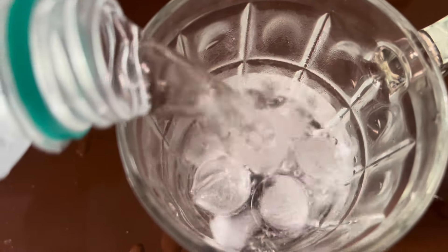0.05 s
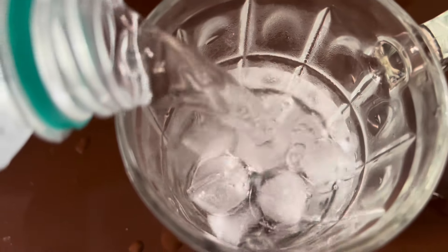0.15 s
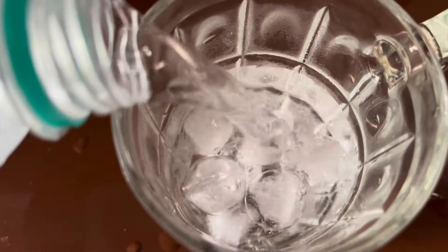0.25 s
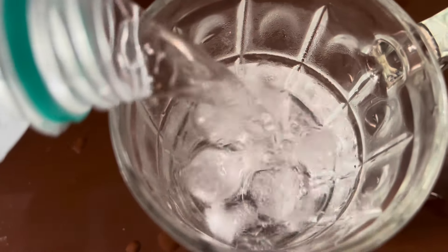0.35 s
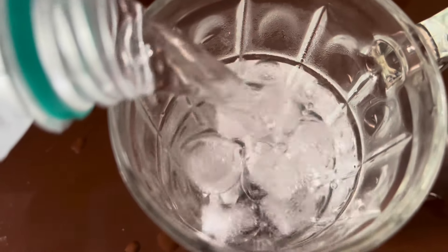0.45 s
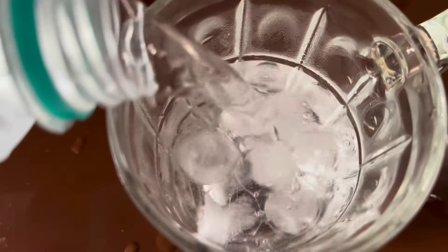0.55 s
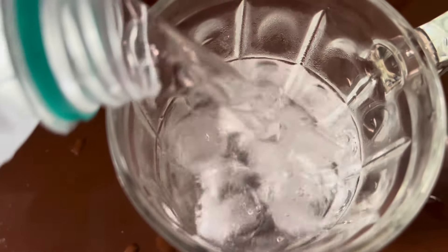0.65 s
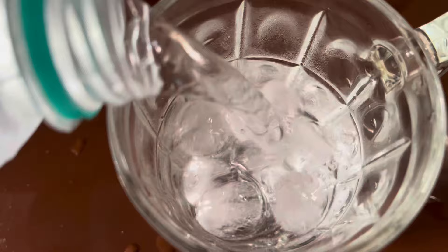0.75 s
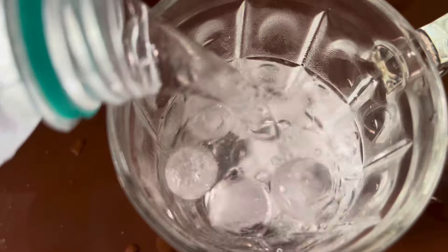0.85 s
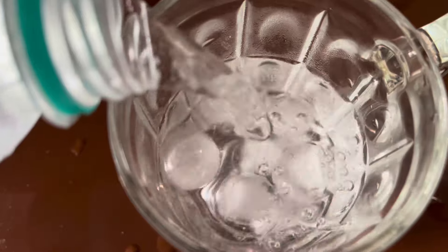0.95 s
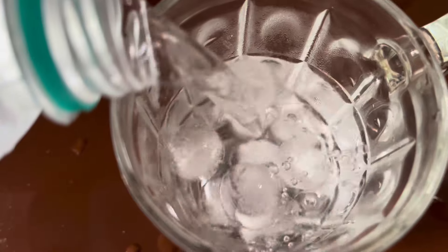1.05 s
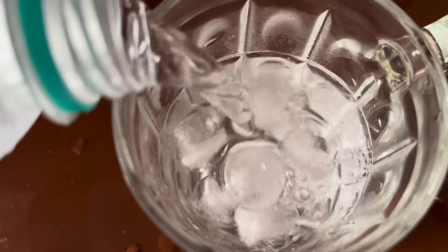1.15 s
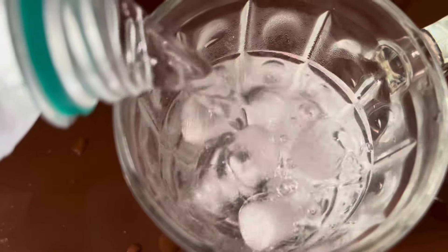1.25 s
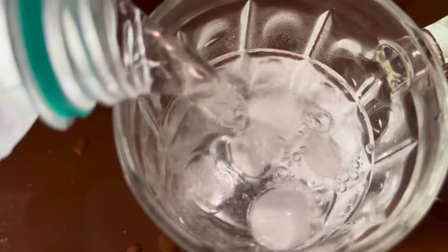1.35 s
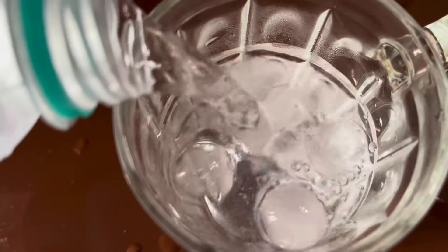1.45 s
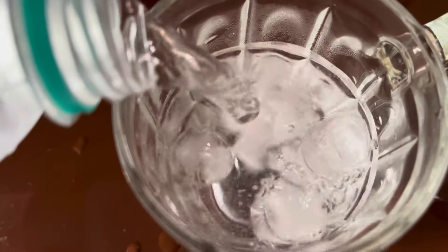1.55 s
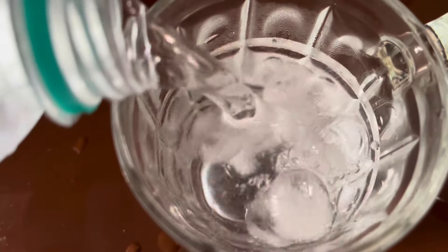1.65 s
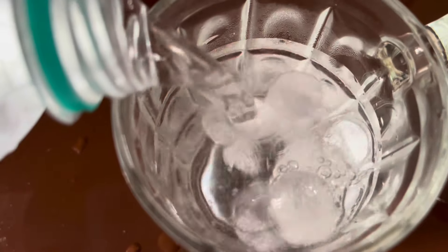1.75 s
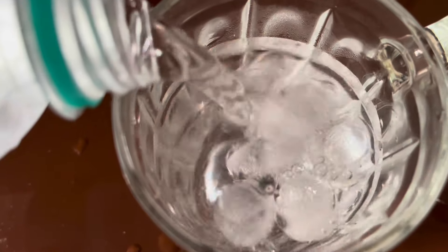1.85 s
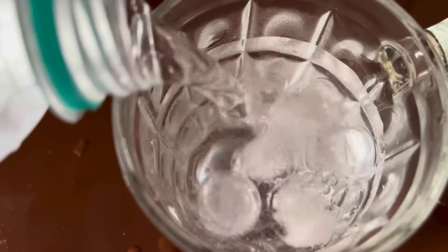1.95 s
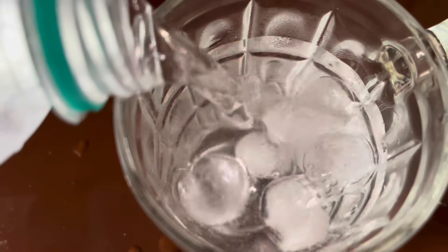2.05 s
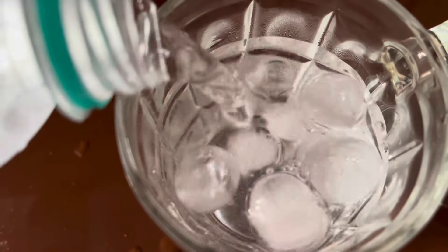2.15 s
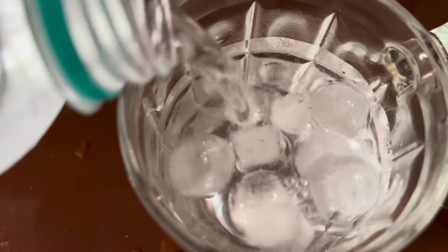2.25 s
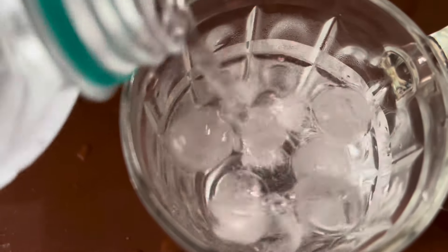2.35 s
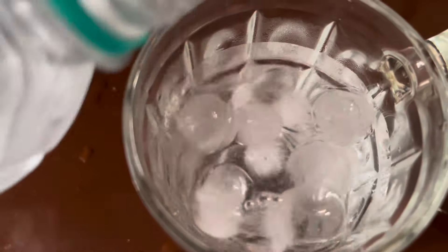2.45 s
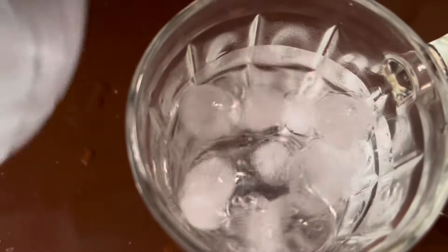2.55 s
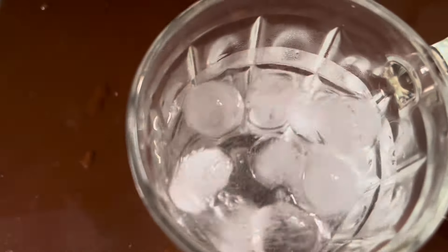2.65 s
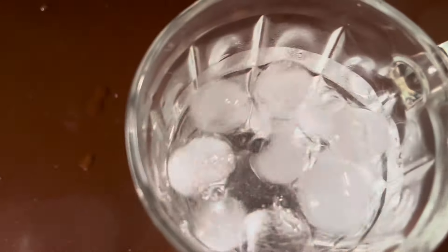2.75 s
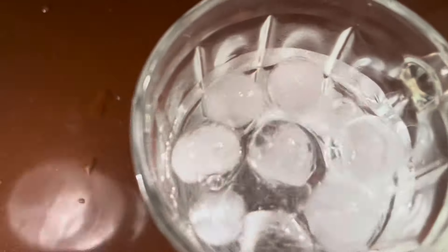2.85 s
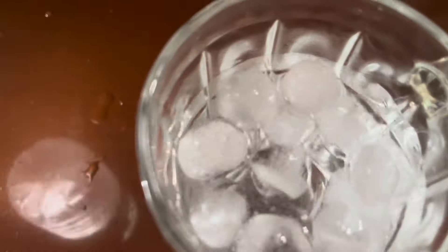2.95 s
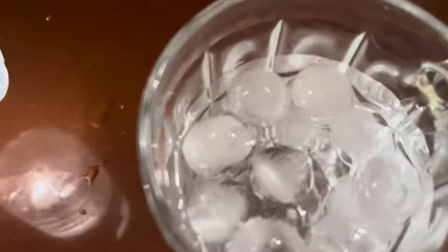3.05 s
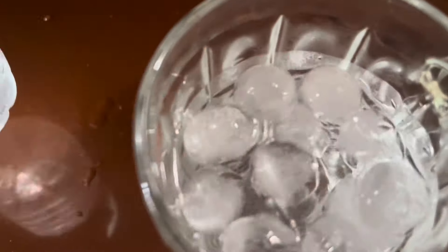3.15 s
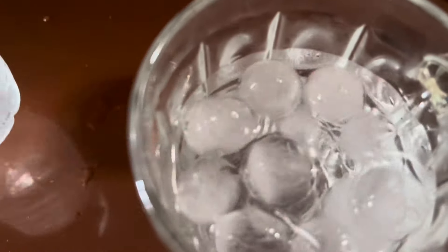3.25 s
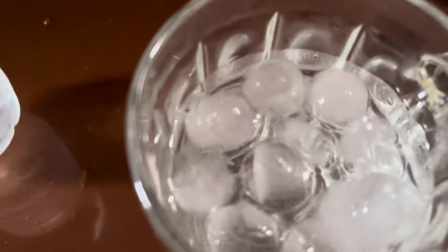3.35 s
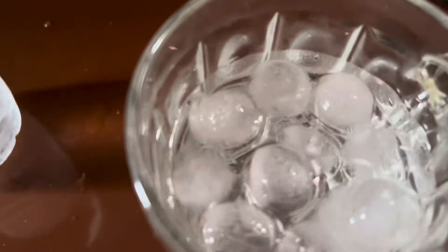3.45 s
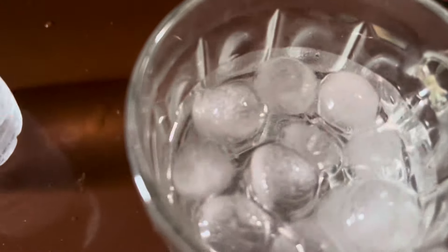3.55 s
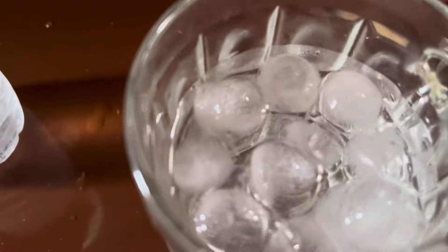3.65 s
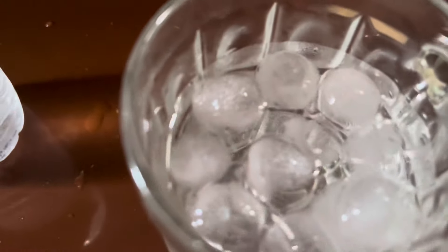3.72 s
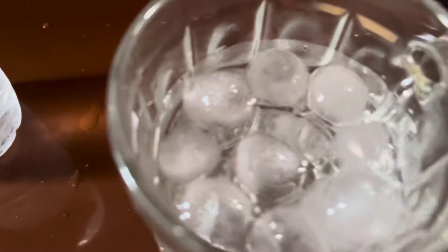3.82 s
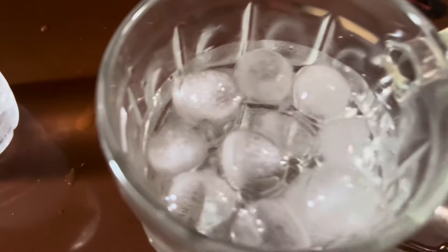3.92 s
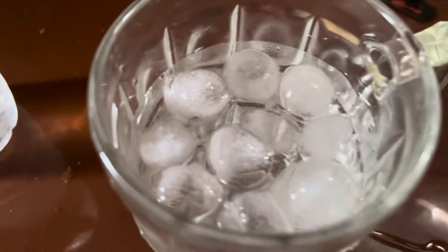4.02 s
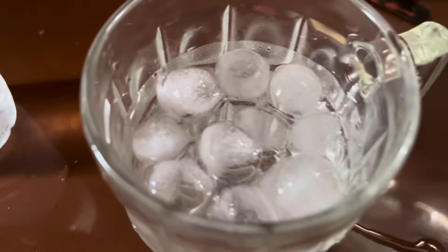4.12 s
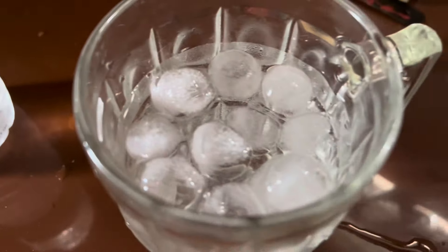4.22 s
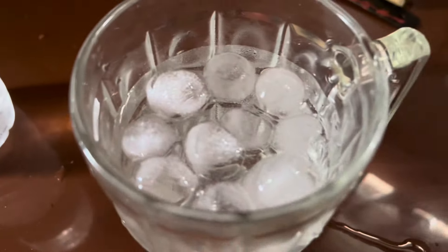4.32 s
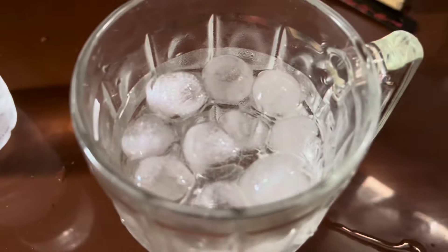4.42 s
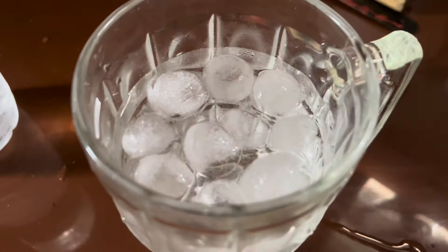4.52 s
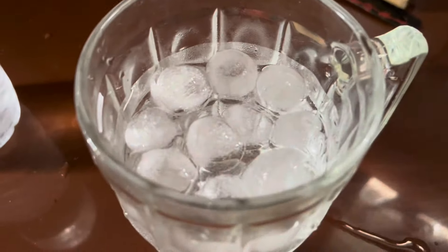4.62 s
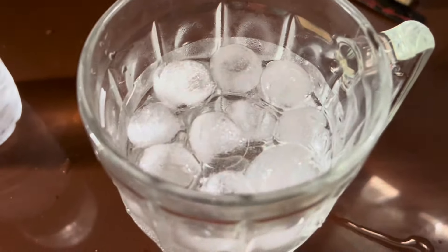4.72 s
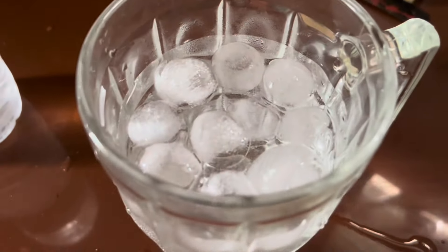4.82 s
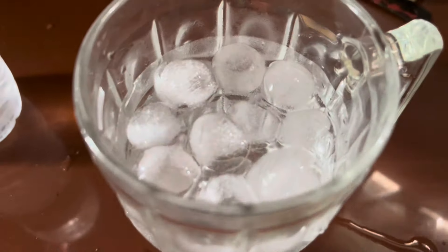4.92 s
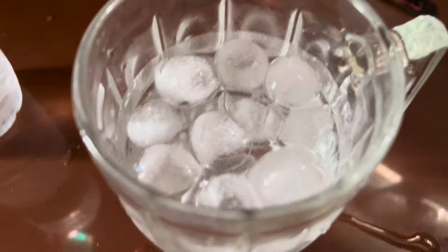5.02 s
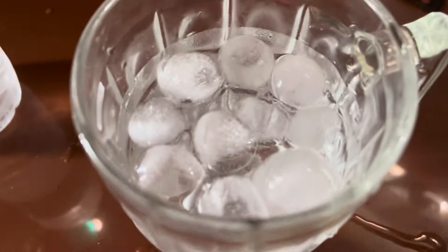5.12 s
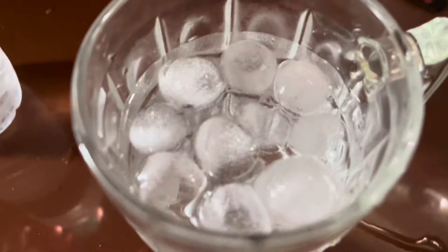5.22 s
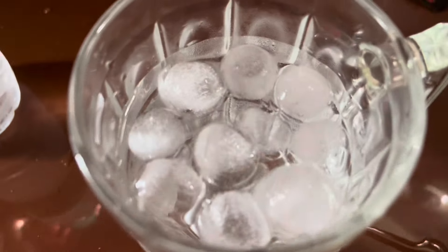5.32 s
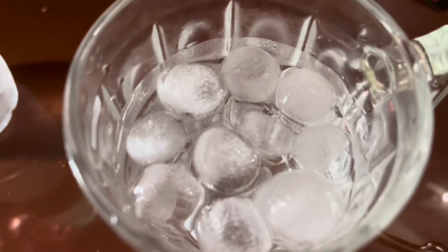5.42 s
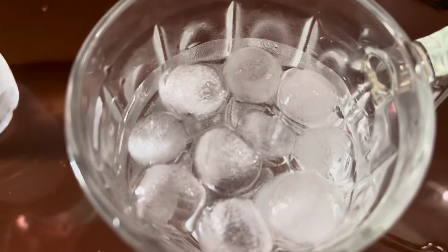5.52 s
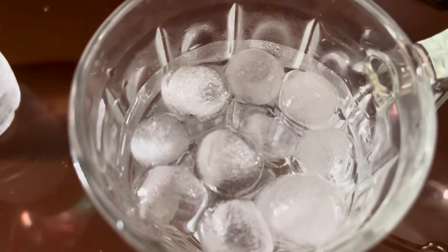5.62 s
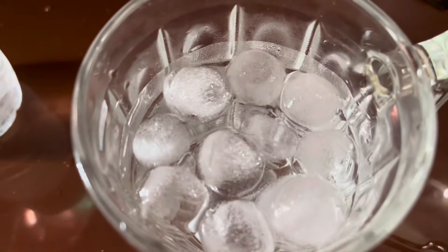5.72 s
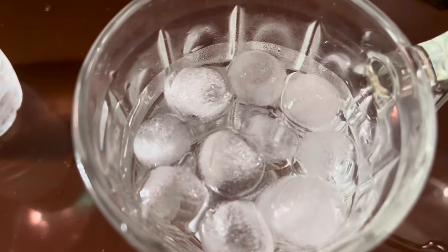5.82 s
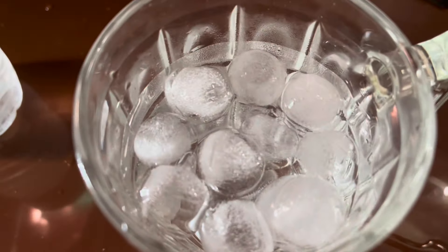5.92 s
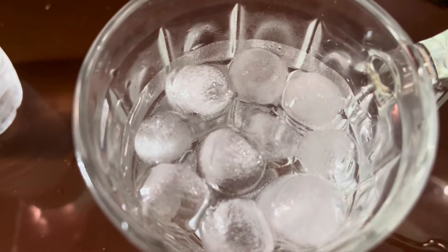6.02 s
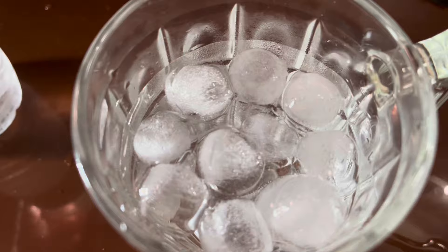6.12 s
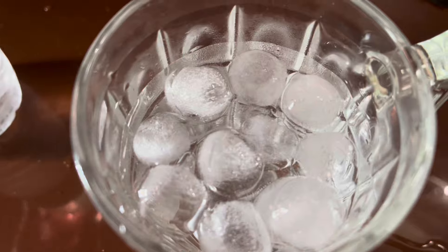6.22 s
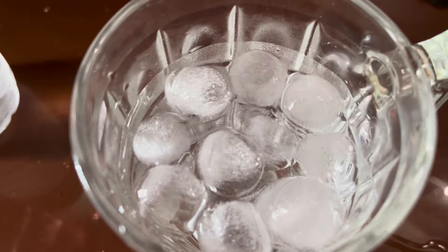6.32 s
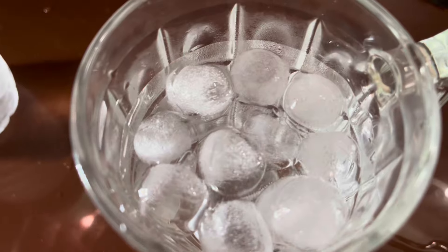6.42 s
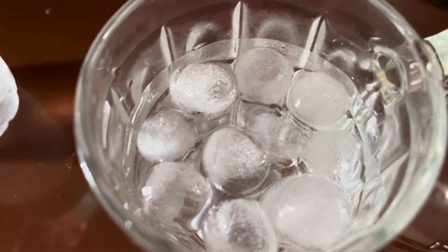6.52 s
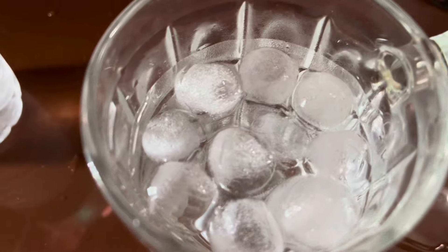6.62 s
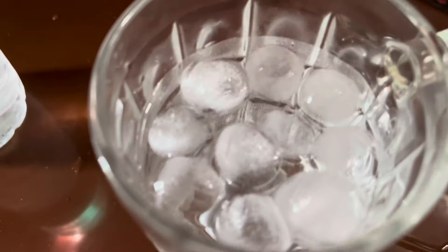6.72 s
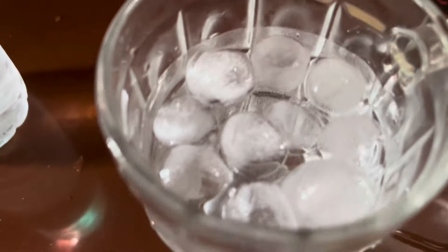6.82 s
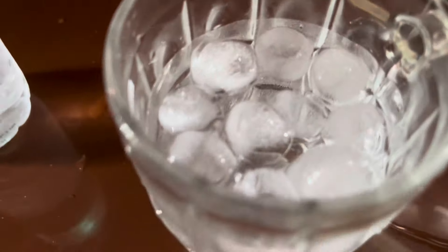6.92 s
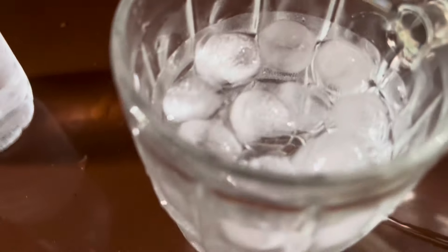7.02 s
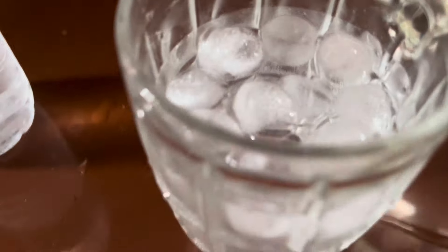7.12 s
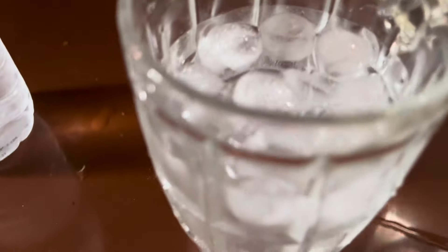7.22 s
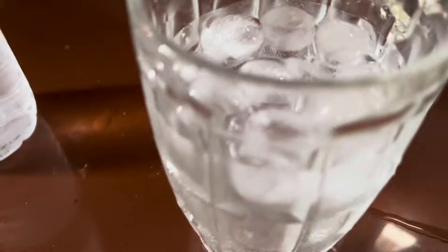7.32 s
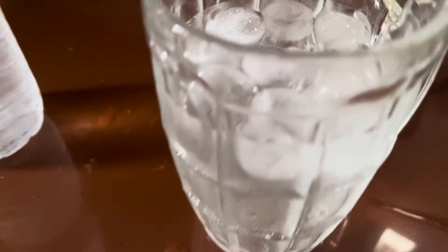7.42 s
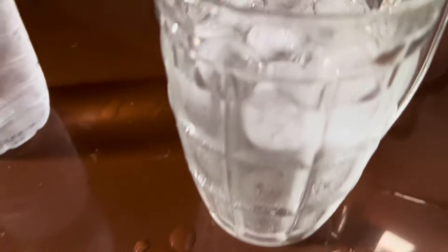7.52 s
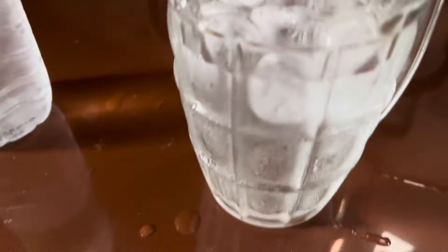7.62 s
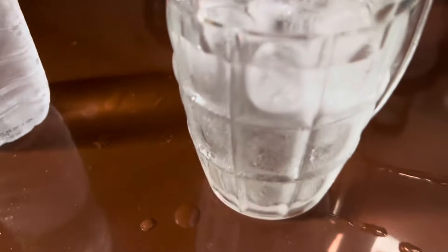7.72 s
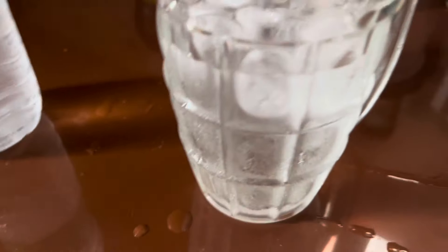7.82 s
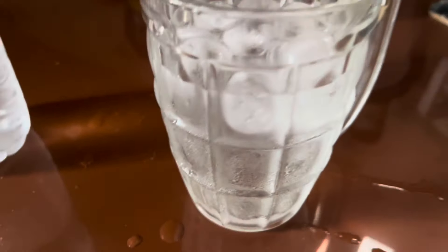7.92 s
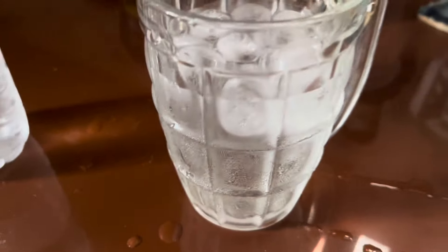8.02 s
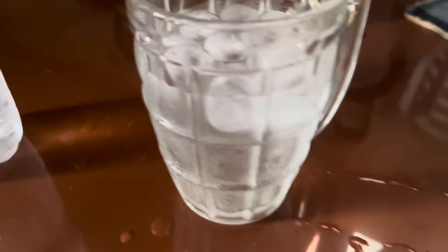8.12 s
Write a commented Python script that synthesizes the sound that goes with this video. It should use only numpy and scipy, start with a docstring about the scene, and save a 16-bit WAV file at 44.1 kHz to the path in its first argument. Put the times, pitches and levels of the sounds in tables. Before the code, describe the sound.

From the start, water glugs close by from a plastic bottle onto ice balls in a glass mug. Strong hollow plops come thickest in the first half second, with splashes and crowds of small bubbles whose pitch climbs as the mug fills. Ice cracks sharply and ticks against the glass, leaving short bright rings that sink slightly. The flow weakens after 1.3 s, surges briefly and ends around 2.5 s, with a last trickle and scattered clinks until 3.4 s. A plastic snap at 2.8 s, a small scrape at 3.2 s and a woody thud at 3.5 s mark the bottle being set down. Then it is quiet: small plastic clicks at 5.2 and 5.6 s, muffled finger thumps, faint cloth and skin brushing. At 7.7-8 s something drags in stuttering wooden slips, farther off left. Low room hum, rumble and faint hiss sit beneath; the sound is close, dry, stereo phone pickup.

```python
"""Water pours from a bottle onto ice balls in a glass mug, close to a phone: air pockets plop as damped sines
over noise splashes and a crowd of small bubbles, pitched up as the air column shortens. Ice cracks in patchy
noise on the wall, whose ringing modes sink as it fills. Then the bottle is set down on a wooden table, plastic
clicks, something drags farther off to the left, a hand shifts on the case and cloth and skin brush near it.
The quiet room behind is filtered noise, with a hum near 98 Hz."""
import sys
import numpy as np
from scipy import signal
from scipy.fft import rfft, irfft, next_fast_len
from scipy.io import wavfile
from scipy.ndimage import uniform_filter1d, map_coordinates

SR = 44100
rng = np.random.default_rng(int(sys.argv[2]) if len(sys.argv) > 2 else 0)


def inscribe(sig):
    """Save sig as 16-bit PCM at rate SR to the path in sys.argv[1].

    A 1-D sig is mono; a 2-D sig holds one channel per row.
    Samples are clipped to [-1, 1] before scaling.
    """
    pcm = np.round(np.clip(np.atleast_2d(sig).T, -1, 1) * 32767)
    wavfile.write(sys.argv[1], SR, pcm.astype(np.int16))


N = 360297

# Levels in dB are relative within each layer unless a comment says more.
# Large air pockets in the mug. Each row: start in seconds, level in dB, pitch in Hz, ringing time in seconds.
PLOPS = [(0.0298, -18, 1110, 0.073), (0.0403, -16.5, 1118, 0.057), (0.051, -37, 1130, 0.074),
         (0.066, -22, 1100, 0.044), (0.0858, -7.5, 1130, 0.028), (0.098, -29, 1420, 0.029),
         (0.108, -11.5, 1280, 0.021), (0.13, -20.5, 1220, .024), (0.171, -26.5, 1310, 0.013),
         (0.182, -21, 2250, 0.011), (0.225, -29, 2070, 0.016), (0.234, -25, 2700, 0.017),
         (0.245, -26, 1050, 0.0058), (0.285, -26, 1100, 0.012), (0.322, -24.5, 1350, 0.03),
         (0.355, -39, 1510, .017), (0.369, -14, 1260, 0.01), (0.385, -33, 1600, 0.017),
         (0.393, -24, 1580, 0.016), (0.402, -32, 1130, .025), (0.423, -27, 1690, 0.018),
         (0.432, -14.5, 1130, 0.0093), (0.445, -25.5, 1006, 0.1), (0.454, -26, 1210, 0.015),
         (0.476, -27, 1930, 0.021), (0.485, -25, 979, 0.089), (0.547, -29, 1890, 0.05),
         (0.58, -17.5, 2844, 0.03), (0.597, -28.5, 1270, 0.028), (0.631, -32, 1340, 0.029),
         (0.662, -17, 1265, 0.0066), (0.745, -20.5, 1500, 0.019), (0.759, -23.5, 1790, .03),
         (0.768, -22.5, 1080, 0.052), (0.784, -30, 1480, 0.022), (0.799, -27, 1400, 0.016),
         (0.808, -21.5, 2810, 0.033), (0.834, -25.5, 2170, .016), (0.846, -25, 1300, 0.033),
         (0.863, -18.5, 1510, 0.012), (0.882, -32, 1500, 0.022), (0.942, -29, 1760, 0.038),
         (0.981, -34, 1190, .02), (0.999, -25, 2430, 0.014), (1.011, -35, 1430, 0.016),
         (1.035, -18.5, 1390, 0.0063), (1.071, -27.5, 1330, 0.025), (1.083, -26, 1400, 0.024),
         (1.099, -25.5, 1420, 0.0088), (1.145, -33, 1500, 0.041), (1.186, -21, 2610, 0.04),
         (1.218, -24.5, 1654, 0.039), (1.254, -28, 1550, .024), (1.262, -30, 2160, 0.017),
         (1.272, -20.5, 1797, 0.038), (1.304, -34, 1840, 0.022), (1.374, -36, 2870, 0.026),
         (1.419, -29.5, 2100, 0.0086), (1.538, -32, 2280, 0.034), (1.605, -36, 1640, .024),
         (1.648, -23.5, 1650, .022), (1.662, -25.5, 1580, 0.03), (1.682, -25, 1600, 0.021),
         (1.716, -30, 1470, .024), (1.768, -36, 1800, 0.018), (1.786, -32.5, 1780, 0.019),
         (1.872, -32, 1690, 0.028), (2.001, -39.5, 1640, .022), (2.081, -29, 1714, 0.051),
         (2.27, -25.5, 2050, 0.0083), (2.335, -37, 2110, .02), (2.583, -40, 2030, .025)]
# Bubbles bursting at the surface. Each row: start in seconds, level in dB, starting Hz, t60 in seconds.
BLIPS = [(0.071, -25, 2380, 0.035), (0.8, -23.5, 2240, 0.041), (2.083, -29.5, 1597, 0.054),
         (2.112, -38, 1840, 0.04)]
# Splash colour in the empty and in the full mug. Each row: frequency in Hz, density in dB per Hz.
SPLASH_EMPTY = [(600, -42), (950, -1), (1500, 12.5), (2200, -19), (3100, 16), (3600, -43), (6000, -11),
                (12000, -39)]
SPLASH_FULL = [(900, -38), (1500, -1), (2200, 7), (3100, -11), (3600, -29), (6000, -14), (12000, -57)]
# Flow of the stream. Each row: time in seconds, level in dB.
FLOW = [(0.0, -46), (0.5, -46.5), (0.85, -45.5), (1.3, -56), (1.7, -49), (1.9, -57.5), (2.1, -48),
        (2.3, -51.5), (2.42, -59), (2.7, -56.5)]
# Ice on the wall. Each row: start in seconds, crack, low pair, middle ring and high ring levels in dB.
CLINKS = [(0.0386, -34.5, -59, -60, -65), (0.085, -12.5, -38, -46, -39), (0.1094, -28.5, -55, -55, -49),
          (0.1441, -33.5, -60, -59, -52), (0.1796, -39, -49, -60, -52), (0.2208, -38.5, -42.5, -59, -60),
          (0.369, -52, -49, -48, -50), (0.382, -41, -48, -46, -47), (0.399, -33.5, -55, -55, -46),
          (0.4302, -37.5, -35.5, -47, -43), (0.4431, -36, -46, -55, -40), (0.4787, -29, -40, -58, -44),
          (0.4847, -31, -37.5, -52, -57), (0.547, -39, -47, -46, -63), (0.5797, -44, -50, -55, -52),
          (0.659, -27, -46, -43.5, -43.5), (0.742, -35, -43, -45, -54), (0.7694, -32.5, -38, -42, -40),
          (0.833, -33, -40, -35.5, -57), (0.9068, -36.5, -64, -50, -55), (0.9962, -30.5, -50, -44, -48),
          (1.0103, -39, -47, -42, -48), (1.153, -43, -46, -63, -67), (1.1866, -27.5, -39, -48, -61),
          (1.217, -31, -55, -41, -42), (1.2336, -43, -39, -57, -63), (1.2527, -49, -53, -54, -58),
          (1.2706, -19.5, -45, -53, -45), (1.377, -34, -49, -41.5, -51), (1.402, -36, -51, -53, -53),
          (1.4195, -34, -52, -37.5, -43), (1.441, -35, -39, -66, -53), (1.5, -42, -49, -43.5, -46.5),
          (1.5682, -39.5, -51, -67, -67), (1.588, -36, -55, -62, -57), (1.6196, -26, -42.5, -61, -64),
          (1.662, -41, -50, -55, -61), (1.6798, -35, -60, -50, -39.5), (1.7304, -35, -43, -48, -55),
          (1.7493, -34, -53, -65, -54), (1.7728, -37, -48, -39, -61), (1.8297, -26.5, -38.5, -71, -56),
          (1.8662, -26, -38, -47, -34.5), (1.934, -41, -58, -64, -62), (2.0003, -55, -44, -50.5, -66),
          (2.0542, -47, -46, -50, -60), (2.078, -26.5, -44, -46, -46), (2.0975, -40, -46, -48, -60),
          (2.1341, -36, -44.5, -42.5, -45), (2.174, -47, -45.5, -63, -47), (2.234, -34, -50, -46, -52),
          (2.2472, -33, -42, -58, -43), (2.2717, -34, -45, -57, -52), (2.292, -34, -41, -44, -47),
          (2.338, -35, -42, -51, -52), (2.39, -53, -58, -64, -64), (2.4197, -27.5, -46, -46, -35),
          (2.5453, -39, -40.5, -47, -40), (2.5849, -35.5, -44.5, -55, -50), (2.644, -38, -52, -69, -49),
          (2.6883, -45, -51.5, -62, -52), (2.742, -39.5, -50.5, -48.5, -61), (2.767, -34, -49, -51, -52),
          (2.8931, -31, -52, -55.5, -46), (2.9163, -41, -63, -51.5, -56), (2.9605, -42.5, -53, -49, -62),
          (3.0159, -37.5, -57, -61, -58), (3.0413, -36, -57, -67, -46), (3.2945, -33.5, -53.5, -60, -46),
          (3.3526, -39, -65, -63, -51), (3.4196, -42, -57, -56, -69), (3.447, -48, -58, -71, -68)]
# Wall modes of the mug. Each row: Hz when pouring starts, Hz when full, level in dB, t60 in seconds.
LOW_RING = [(1930, 1755, -4, 0.19), (1721, 1590, -5.5, 0.24)]
MIDDLE_RING = [(3150, 3105, 0.005, 0.23)]
HIGH_RING = [(4570, 4200, 2, 0.049), (6400, 5300, -4.5, 0.014)]
# The ice drifts round the wall and favours one of the low pair.
# Each row: time in seconds, extra level of the second over the first in dB.
PAIR_LEAN = [(0, -15), (1.1, -7.5), (1.4, 1), (1.48, -8), (1.62, 2), (1.78, -6), (1.83, 1), (1.87, -9),
             (2.03, 9), (2.2, -3), (2.35, 5), (2.56, -5), (2.8, -3), (2.96, 4), (3.45, 11)]
# Crack of ice, also the colour of the spray. Each row: frequency in Hz, density in dB per Hz.
TICK = [(600, -32), (1050, -35), (1600, -7), (2400, -7), (3200, 1), (3700, -9.5), (4400, -4.5),
        (5000, -3.5), (6200, -10), (8000, -12.5), (10500, -11.5), (11800, -24), (15500, -77)]
# Plastic near the phone. Each row: start in seconds, level in dB, first Hz, second Hz,
# second level in dB, crack level in dB, t60 in seconds.
CLICKS = [(2.823, -20, 1930, 1100, -4.5, -8, 0.016), (3.17, -47, 1770, 330, 2, -2, 0.02),
          (3.192, -38.5, 1150, 1820, -7, -11, 0.047), (3.534, -48, 1210, 670, 15.5, -13, .022),
          (4.388, -45, 2260, 1250, -5, -2, 0.026), (5.2183, -24, 2970, 3640, -7.5, -11, 0.019),
          (5.26, -28, 1360, 3090, -1, -9.5, 0.0093), (5.593, -46.5, 2310, 3750, -3, 7.5, 0.056),
          (5.61, -31, 3650, 1530, -11, 1, 0.019), (5.62, -32.5, 1330, 2900, -5, -9, 0.012),
          (5.703, -41, 2920, 1490, 0, -7, 0.024), (5.708, -36.5, 3670, 1040, -5, 1.5, 0.01),
          (5.712, -32.5, 2220, 2980, -3, -2.5, 0.018), (6.148, -47, 1930, 1200, -9, -14, 0.028),
          (6.195, -47, 1540, 1180, 3.5, -15, 0.024)]
# Colour of a plastic snap. Each row: frequency in Hz, density in dB per Hz.
SNAP = [(410, -2.5), (700, -1), (1980, -6.5), (2180, -4.5), (2500, -8), (3040, -1), (4830, -13.5),
        (6020, -13.5), (10600, -13.5), (11600, -27), (13000, -63)]
# Blows on the table. Each row: start in seconds, level in dB, second mode in dB, upper modes in dB,
# share of the free ringing time.
KNOCKS = [(2.828, -34, -8, 5, 0.76), (3.167, -39, -12, -7, 0.73), (3.538, -24, 1, 3, 0.95),
          (3.568, -32, 7.5, 14, 0.31), (5.218, -41, -8, 13, 1), (5.545, -39.5, -20, -6, 0.56),
          (5.611, -37, -20, -4, 0.33)]
# Modes of the table top. Each row: frequency in Hz, level in dB, free t60 in seconds.
TABLE_MODES = [(368.3, 7, 0.35), (391, 12, 0.24), (528, -11, 0.13), (570, -11.5, 0.16),
               (1130, -15.5, 0.071)]
# Fingers on the case. Each row: start in seconds, level in dB, final Hz, pitch drop scale in Hz,
# decay scale in seconds.
THUMPS = [(2.381, -28, 127, 373, 0.046), (2.463, -31, 119, 770, 0.033), (3.168, -34, 276, 150, 0.055),
          (4.824, -30.5, 87.7, 440, 0.15), (5.13, -48, 73, 149, 0.23), (5.709, -38.5, 198, 200, 0.066),
          (6.43, -44, 65, 180, 0.14), (6.647, -39.5, 70, 216, 0.13), (7.012, -34.5, 78.6, 614, 0.13)]
# Steady rubbing, one list for each drag. Each row: time in seconds, level in dB.
DRAGS = [
    [(3.172, -51), (3.19, -39.5), (3.258, -44), (3.34, -48.5), (3.4, -58), (3.47, -65)],
    [(7.69, -66), (7.72, -49.5), (7.85, -45), (7.9, -49), (7.98, -51.5), (8.02, -58), (8.09, -63)],
]
# Low and upper resonances, one list for each drag. Each row: frequency in Hz, width in Hz, level in dB.
DRAG_LOW = [
    [(200, 80, -3.5), (330, 220, -3.5), (595, 123, 3), (770, 127, -7)],
    [(476, 21, -6.5), (560.5, 15, 1), (730, 39, -24)],
]
DRAG_HIGH = [
    [(1100, 87, -1.5), (1970, 110, -0.5), (2620, 140, -9), (3500, 600, -16)],
    [(924, 72, 5), (1640, 250, -6.5), (2300, 260, -8.5)],
]
# The second drag catches and lets go. Each row: start in seconds, level in dB, Hz, t60 in seconds.
JOLTS = [(7.70, -46, 472, 0.15), (7.722, -35, 510, 0.071), (7.747, -32.5, 502, .05),
         (7.768, -28, 530, 0.066), (7.778, -38.5, 720, 0.074), (7.79, -28, 556, 0.057),
         (7.806, -31, 558, .05), (7.818, -31, 558, 0.12), (7.843, -37.5, 570, 0.13)]
# Cloth and skin. Each row: peak in seconds, level in dB, bright part in dB over the dull,
# rise and fade in seconds over 20 dB, lower resonance in Hz.
RUSTLE = [(4.43, -56.5, -10, 0.11, 0.15, 2180), (5.95, -77.5, 16.5, 0.09, 0.17, 2400),
          (6.25, -57, -6, 0.25, 0.12, 1720), (6.5, -70, 6.5, 0.039, 0.24, 2400),
          (6.78, -59.5, -7, 0.07, 0.11, 3050), (7.5, -55.5, 0.5, 0.12, 0.086, 2400)]
# Room layers over time. Each row: time in seconds, level in dB.
RUMBLE = [(0, -65.5), (1.2, -62.5), (1.7, -61), (2.55, -63), (3.45, -58.5), (3.57, -53), (3.85, -60.5),
          (4.9, -62), (5.4, -68.5), (6.3, -73), (7.0, -70.5), (8.17, -73)]
HUM = [(0, -58.5), (0.3, -53.5), (3.45, -54.5), (3.57, -46), (3.8, -55), (5.1, -55), (5.2, -67),
       (5.45, -63), (6.0, -54.5), (6.4, -56.5), (6.5, -76), (7.15, -66), (7.3, -63), (7.7, -72.5),
       (7.9, -61), (8.17, -69)]
MURMUR = [(0, -56.5), (3.3, -55.5), (5.0, -56.5), (6.3, -57), (6.55, -61), (7.8, -58.5), (8.17, -57.5)]
TREBLE = [(0, -73), (0.4, -74), (0.85, -68.5), (1.6, -74), (2.8, -72.5), (4.5, -78.5), (5.1, -74),
          (6.0, -74), (7.3, -74.5), (8.17, -75)]
# Colour of the room air, left-right sum and difference. Each row: frequency in Hz, density in dB per Hz.
AIR_SUM = [(65, -28), (110, -4.5), (244, -7.5), (281, -12), (330, -4.5), (600, -12), (800, -16.5),
           (1500, -25.5), (3150, -29.5), (4400, -34.5), (4900, -45), (5350, -35.5), (6100, -32),
           (8050, -36.5), (9000, -61.5), (10600, -28.5), (11500, -43.5), (13000, -90)]
AIR_DIFF = [(40, -20), (270, -12.5), (620, -7), (1400, -17), (1800, -26.5), (3300, -21.5), (5300, -27.5),
            (6000, -45), (6900, -31), (8200, -21), (10600, -20), (11400, -36), (12500, -73)]
# Near sounds at the two microphone ports. Each row: frequency in Hz, left-right difference over sum in dB.
PORTS = [(60, -32), (330, -6.5), (770, 4), (1170, -18), (1790, -27), (2740, -2.5), (4200, -4), (5000, 12),
         (6100, -14), (7800, -4.5), (9000, 21.5), (10500, -1), (15000, -4)]

FULL_S = 2.5  # the mug is full
COLUMN_HZ = (903, 1666)  # air column above the water: when pouring starts, when full
SPLASH_DB, SPLASH_T60_S = -12.5, 0.028  # relative to the plop
POP_DB, POP_T60_S = 15.5, 0.0072  # a plop starts with a few strong cycles
BLIP_RISE = 0.6  # share by which the pitch climbs over one t60
SPRAY_DB = -13.5  # relative to the flow
SINGING_DB = (20, 38, 13, 26)  # steady first low, second low, middle and high ring: dB under the flow
DRAG_UPPER_DB, DRAG_ROUGH_DB = (-10.5, -9), (1, 2)  # one value for each drag
DULLING_DB_PER_S = (33, 2)  # the upper resonances of a drag fade sooner, for up to 1 s
ECHO_DB, ECHO_T60_S = -15.5, 0.076  # table top and nearby things answer the near sounds
TOP_HZ = 16000  # band limit of the phone


def pour():
    """Large air pockets plop and splash; small bubbles crowd after them, in and above the air column's pitch."""
    s, db, hz, t60 = np.transpose(PLOPS)
    fill = np.clip(np.arange(N) / SR / FULL_S, 0, 1)
    empty = patchy(lambda f: amp(along(SPLASH_EMPTY, f)), patchy_db=2.5)
    full = patchy(lambda f: amp(along(SPLASH_FULL, f)), patchy_db=2.5)
    splash = swells(s, db + SPLASH_DB, SPLASH_T60_S, attack=0.001)
    splash = splash * (np.sqrt(1 - fill) * empty + np.sqrt(fill) * full)
    pops = rings(s, hz, db + POP_DB, POP_T60_S, attack=0.0018, size=600, order=2)
    tails = rings(s, hz, db - 5.5, t60 + 0.00093, rise=0.02, attack=0.0018, size=2048)
    # each plop stirs up small bubbles after it
    stirred = swells(s, db - 23, 0.08, attack=0.0021)

    s, db, hz, t60 = np.transpose(BLIPS)
    blips = rings(s, hz, db, t60, rise=BLIP_RISE, attack=0.0028)

    when, which, size, life = rng.random((1700, 4)).T
    s = when * FLOW[-1][0]
    column_hz = np.interp(s, [0, FULL_S], COLUMN_HZ)
    # most bubbles are drawn out by the column, so pitches gather near it
    pitch = column_hz + (3200 - column_hz) * which ** 1.45
    bubble_db = -2.6 * np.log(size + 0.01) - 4 * which
    small = rings(s, pitch, bubble_db, (10 + 28 * life) / pitch, rise=0.015, size=900)
    flow = amp(curves(FLOW, outside=-120)[0] + 4.3 * wobble(30.84))
    bubbles = (flow * amp(-10) + stirred) * unit(small)

    # droplets tick unevenly
    droplets = amp(5 * wobble(160)) * patchy(lambda f: amp(along(TICK, f)), patchy_db=5)
    spray = flow * amp(SPRAY_DB) * unit(droplets)
    return pops + tails + splash + blips + bubbles + spray


def clinks():
    """Ice cracks on the wall and rebounds faintly; the glass rings lower the more water loads it."""
    s, db, low_db, middle_db, high_db = np.transpose(CLINKS)
    lean_db = np.interp(s, *np.transpose(PAIR_LEAN)) / 2
    fill = np.clip(s / FULL_S, 0, 1)
    flow_db, = curves(FLOW, outside=-120)

    late, weaker = rng.random((len(s), 2)).T
    crack = swells(s, db + 6.5, 0.01, attack=0.0014)
    crack += swells(s, db - 14.5, 0.054, attack=0.0046)
    crack += swells(s + 0.0095 + 0.0174 * late, db - 5.0 - 12 * weaker, 0.0071, attack=0.00051)  # rebound
    # no two cracks have the same colour
    glass = crack * patchy(lambda f: amp(along(TICK, f)), patchy_db=4.0)

    walls = (LOW_RING[:1], LOW_RING[1:], MIDDLE_RING, HIGH_RING)
    strengths = (low_db - lean_db, low_db + lean_db, middle_db, high_db)
    for wall, strength, under_db in zip(walls, strengths, SINGING_DB):
        for start_hz, full_hz, level, t60 in wall:
            scatter, detune = rng.standard_normal((len(s), 2)).T
            hz = (start_hz + (full_hz - start_hz) * fill) * (1 + 0.0023 * detune)
            hit_db = strength + level + 1.3 * scatter
            ring = rings(s, hz, hit_db, t60, attack=0.00043, size=min(5000, round(t60 * SR)))
            # the stream keeps the mode sounding
            sinking_hz = np.interp(np.arange(N) / SR, [0, FULL_S], [start_hz, full_hz])
            turns = np.cumsum(sinking_hz) / SR
            ring += amp(flow_db + level - under_db) * wobble(45) * np.sin(2 * np.pi * turns)
            # sloshing water makes each mode waver
            glass += ring * amp(3.7 * wobble(60))
    return glass


def plastic():
    """Short snaps with two brief pitches, and a noise puff that fades after them."""
    s, db, hz, second_hz, second_db, crack_db, t60 = np.transpose(CLICKS)
    puffs = swells(s, db + crack_db, 0.019, attack=0.0011)
    puffs += swells(s, db + crack_db - 16.5, 0.16, attack=0.0053)
    snap = puffs * patchy(lambda f: amp(along(SNAP, f)), patchy_db=2.5)
    first = rings(s, hz, db, t60, size=1500)
    second = rings(s, second_hz, db + second_db, t60, size=1500)
    return snap + first + second


def table():
    """A soft blow rings the table top; two close modes beat."""
    s, db, second_db, upper_db, free = np.transpose(KNOCKS)
    out = np.zeros(N)
    for k, (hz, level, t60) in enumerate(TABLE_MODES):
        mode_db = db + level - 7.5 + second_db * (k == 1) + upper_db * (k > 1)
        out += rings(s, hz, mode_db, t60 * free, attack=0.0074, size=12000)
    return out


def thumps():
    """Fingers shift on the case: a push whose pitch drops fast."""
    out, t = np.zeros(N + SR), np.arange(4096) / SR
    for s, db, hz, drop_hz, decay in THUMPS:
        # the pitch starts about 1.3 times drop_hz above its final value
        turns = hz * t + drop_hz * 0.0043 * (1 - np.exp(-t / 0.0033))
        # 60 dB down after 0.61 of the decay scale
        gain = amp(db + 2 - 60 * (t / (0.61 * decay)) ** 1.5) * (1 - np.exp(-t / 0.0052))
        out[round(s * SR):][:len(t)] += gain * np.sin(2 * np.pi * turns)
    return out[:N]


def drags():
    """Uneven slips shake a hollow wooden thing farther off, to the left: rough noise through resonances."""
    s, db, hz, t60 = np.transpose(JOLTS)
    out = np.zeros((2, N)) + rings(s, hz, db, t60, attack=0.0024)
    settings = zip(DRAGS, DRAG_UPPER_DB, DRAG_ROUGH_DB, DULLING_DB_PER_S, DRAG_LOW, DRAG_HIGH)
    for level, upper_db, rough_db, dulling, low, high in settings:
        # the two sides share part of the noise
        common, *own = amp(rough_db * wobble(120)) * rng.standard_normal((3, N))
        slips = filtered(common + 0.68 * np.array(own), lambda f: 1 / (1 + (f / 6500) ** 4))
        elapsed = np.clip(np.arange(N) / SR - level[0][0], 0, 1)
        upper = amp(upper_db - dulling * elapsed) * unit(filtered(slips, modes(high)))
        lower = unit(filtered(slips, modes(low)))
        out += amp(curves(level, outside=-120)[0]) * (lower + upper)
    return out * amp([[1.8], [-1.8]])


def rustle():
    """Cloth and skin brush near the phone in small uneven scuffs of noise, some dull, some bright."""
    scuffs = amp(2.5 * wobble(150)) * rng.standard_normal((2, N))
    bright = unit(filtered(scuffs, lambda f: amp(along(AIR_SUM, f)) * (f > 4000)))
    out = np.zeros((2, N))
    for s, db, bright_db, rise, fade, hz in RUSTLE:
        cloth = modes([(hz, 300, 0), (3620, 300, -1.5)])
        dull = unit(filtered(scuffs, lambda f: cloth(f) / (1 + (f / 6000) ** 4)))
        out += ramps(s, db, rise, fade) * (dull + amp(bright_db) * bright)
    return out


def room():
    """Rumble and a wavering hum in the middle; murmur and hiss wider, dull below and airy above."""
    rumble_db, hum_db, murmur_db, treble_db = (curves(rows)[0] for rows in (RUMBLE, HUM, MURMUR, TREBLE))
    rumble = noise(modes([(55.2, 7.4, 1), (173.7, 9.6, -13.5)]))
    rumble = amp(rumble_db + 7.0 + 1.5 * wobble(8.2)) * rumble
    tone = np.sin(2 * np.pi * 98 * np.arange(N) / SR + 0.42 * wobble(11))
    hum = amp(hum_db) * unit(tone + 0.57 * noise(modes([(98.5, 4.4, 0)])))

    # first row is the left-right sum, second the difference
    white = np.array([patchy(np.ones_like, patchy_db=1.54), patchy(np.ones_like, patchy_db=1.4)])
    colour = lambda f: amp([along(AIR_SUM, f), along(AIR_DIFF, f) - 8])
    dull_share = lambda f: 1 / (1 + (f / 1200) ** 4)
    dull = filtered(white, lambda f: colour(f) * dull_share(f))
    airy = filtered(white, lambda f: colour(f) * (1 - dull_share(f)))
    dull = amp(murmur_db + 0.53 * wobble(5.7)) * dull / np.std(dull[0])
    airy = amp(treble_db + 10 + 1.5 * wobble(7)) * airy / np.std(airy[0])
    mid, side = dull + airy
    return rumble + hum + np.array([mid + side, mid - side])


def echoes(x):
    """Short dull reflections, different at each port: decaying smoothed noise as impulse responses."""
    t = np.arange(4096) / SR
    tail = uniform_filter1d(rng.standard_normal((2, len(t))), size=3)
    tail = tail * amp(-60 * t / ECHO_T60_S) * (t > .002)
    return amp(ECHO_DB) * signal.fftconvolve(x[None], tail / np.linalg.norm(tail[0]), axes=1)[:, :N]


def amp(db):
    """Linear gain of a level in dB."""
    return 10 ** (np.asarray(db) / 20)


def unit(x):
    """x scaled to rms 1."""
    return x / np.sqrt(np.mean(x ** 2) + 1e-20)


def along(points, hz):
    """(Hz, value) points joined on a log frequency axis."""
    f, v = np.transpose(points)
    return np.interp(np.log(hz + 1), np.log(f + 1), v)


def curves(rows, outside=None):
    """One value per sample for each column after the time."""
    s, *cols = np.transpose(rows)
    return [np.interp(np.arange(N) / SR, s, c, outside, outside) for c in cols]


def filtered(x, response):
    """x through a complex response of frequency."""
    m = next_fast_len(N + SR // 2)
    return irfft(rfft(x, m) * response(np.fft.rfftfreq(m, 1 / SR)), m)[..., :N]


def noise(response):
    """Coloured noise of rms 1."""
    return unit(filtered(rng.standard_normal(N), response))


def patchy(response, patchy_db):
    """Coloured noise of rms 1 whose colour changes from moment to moment."""
    z = signal.stft(rng.standard_normal(N + 512), nperseg=256)[2]
    field = uniform_filter1d(rng.standard_normal(z.shape), size=4, axis=0)
    field = uniform_filter1d(field, size=5, axis=1)
    patches = signal.istft(z * amp(patchy_db * unit(field)), nperseg=256)[1][:N]
    return unit(filtered(patches, response))


def modes(table):
    """Response of (Hz, width in Hz, dB) resonances, summed with alternating sign."""
    def response(f):
        return sum((-1) ** k * amp(db) * 1j * f * w / (c * c - f * f + 1j * f * w)
                   for k, (c, w, db) in enumerate(table))
    return response


def wobble(rate):
    """A smooth random curve, rate knots a second."""
    return map_coordinates(rng.standard_normal(int(N * rate / SR) + 4), [np.arange(N) * rate / SR])


def rings(s, hz, db, t60, rise=0., attack=0.0007, size=4096, order=1):
    """Damped sines from times s; rise = pitch climb over one t60; a higher order starts more softly."""
    s, hz, db, t60 = (np.broadcast_to(v, np.shape(s))[:, None] for v in (s, hz, db, t60))
    t = np.arange(size) / SR
    envelope = amp(db - 60 * t / t60) * (1 - np.exp(-t / attack)) ** order
    wave = envelope * np.sin(2 * np.pi * hz * t * (1 + rise * t / t60 / 2))
    at = np.round(s * SR).astype(int) + np.arange(size)
    return np.bincount(at.ravel(), wave.ravel(), N + size)[:N]


def swells(s, db, t60, attack):
    """An envelope that rises quickly at times s and dies."""
    starts = np.bincount(np.round(s * SR).astype(int), amp(db), N)[:N]
    t = np.arange(8192) / SR
    return signal.fftconvolve(starts, amp(-60 * t / t60) * (1 - np.exp(-t / attack)))[:N]


def ramps(s, db, attack, release):
    """Gain that climbs 20 dB over attack up to time s and falls 20 dB over release."""
    t = np.arange(N) / SR - s
    return amp(db + 20 * np.minimum(np.minimum(t / attack, 0), -t / release))


def scene():
    """The mug and plastic close to the ports, the table and drag to the left, the room behind."""
    near = pour() + clinks() + plastic()
    # the two ports hear a near source at shifted phases
    turn = lambda f: np.arctan(amp(along(PORTS, f)))
    ports = filtered(near, lambda f: np.exp(1j * np.array([-turn(f), turn(f)])))
    wood = table() * amp([[1.5], [-1.5]])
    return ports + echoes(near) + wood + thumps() + drags() + rustle() + room()


def record(dry):
    """The microphones fade above 11 kHz and the phone keeps nothing above its band limit."""
    return filtered(dry, lambda hz: (hz < TOP_HZ) / np.sqrt(1 + (hz / 11800) ** 9))


dry = scene()
out = record(dry)
inscribe(out)
```